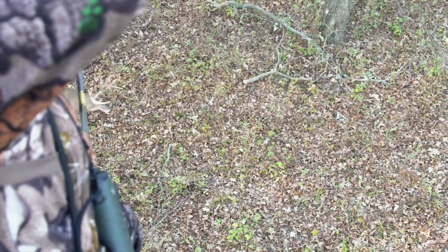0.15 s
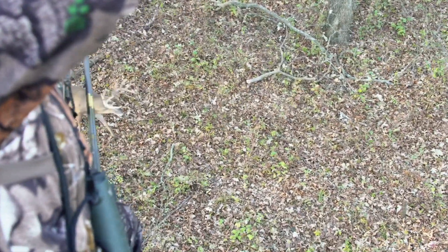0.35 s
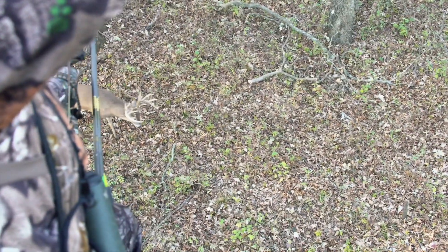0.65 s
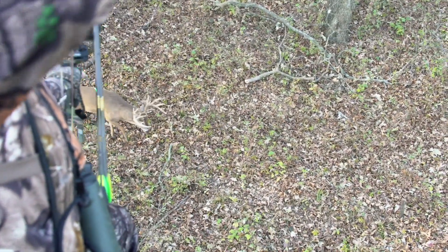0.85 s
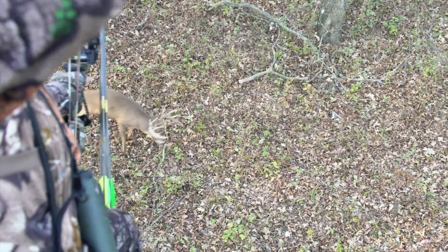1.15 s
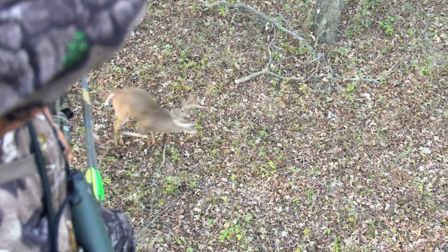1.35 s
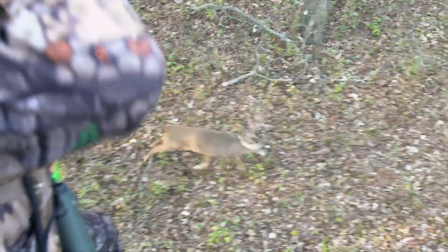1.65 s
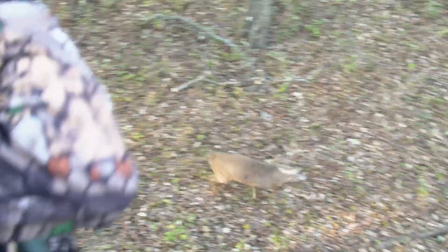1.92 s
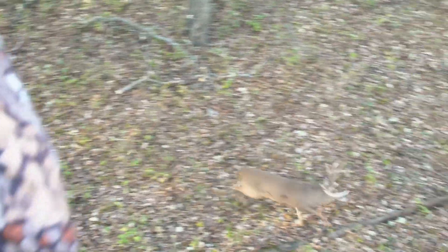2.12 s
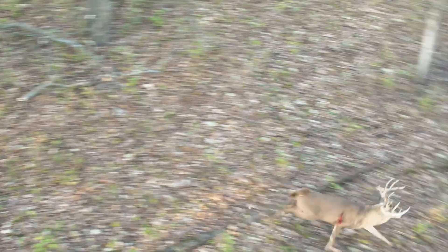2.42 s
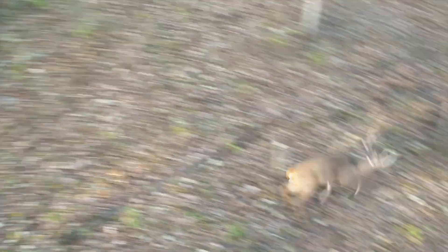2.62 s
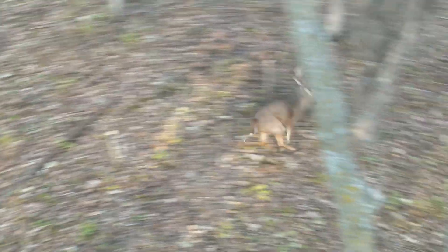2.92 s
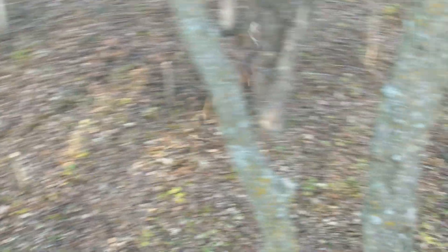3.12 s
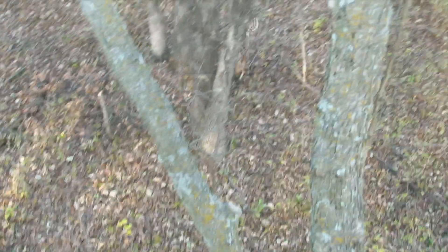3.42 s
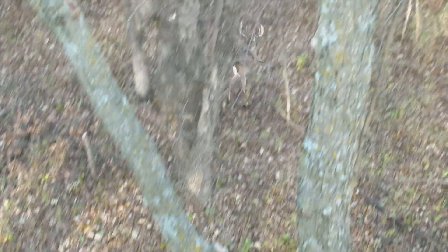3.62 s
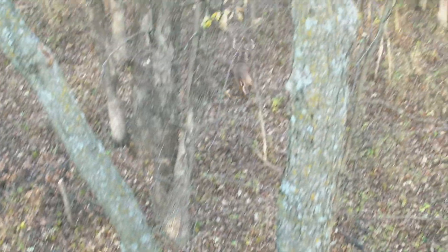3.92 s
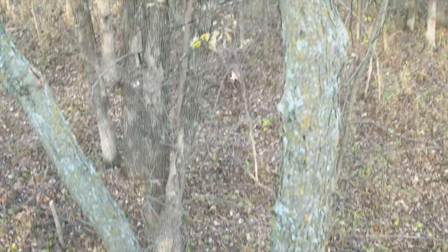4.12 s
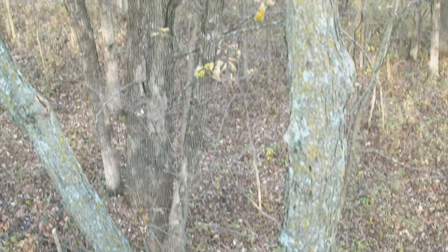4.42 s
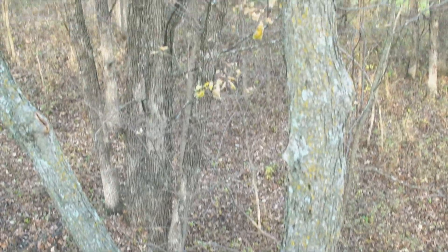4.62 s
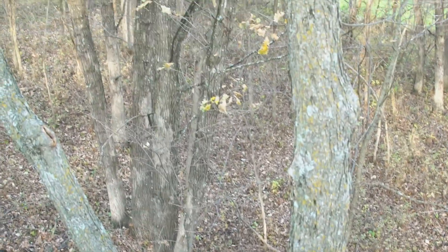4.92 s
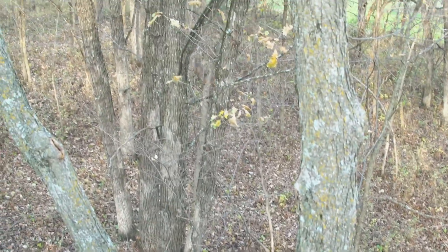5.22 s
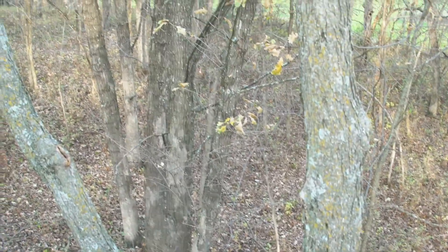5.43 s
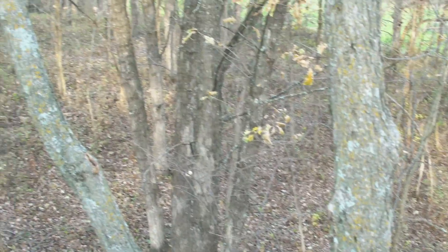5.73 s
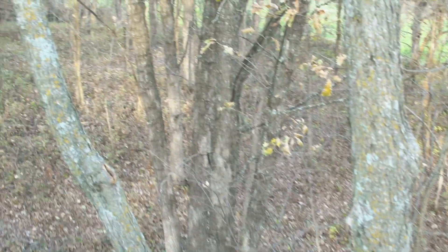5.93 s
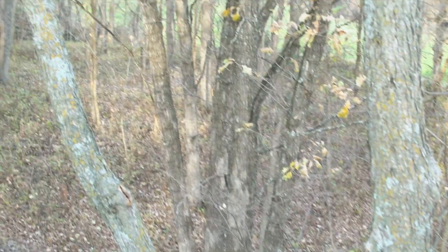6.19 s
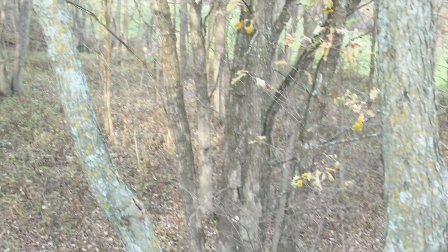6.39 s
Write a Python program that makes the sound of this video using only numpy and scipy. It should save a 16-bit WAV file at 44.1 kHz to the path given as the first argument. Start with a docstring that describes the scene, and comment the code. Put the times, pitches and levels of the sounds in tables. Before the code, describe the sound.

Quiet autumn woodland, heard outdoors through a single microphone: a fine, patchy hiss of dry leaves and a light, low wind rumble. Small soft scuffs come between 0.1 and 0.5 s. At about 0.88 s a bow is loosed with a very sharp, bright slap, a short hard rattle and a brief low limb hum. At 1.0 s the arrow strikes with one compact knock, and leaves burst underfoot. From 1.3 s a deer bounds away in rapid, irregular crunches, brittle and crisp, with twigs snapping, notably at 1.35, 2.5 and 2.9 s. The rush is densest from 2.3 to 3.1 s, with a short scattered echo from trunks. After 3.2 s the steps grow sparser and softer, with a dry snap at 3.9 s and dull, soft thuds beneath. Wind swells around 4.6 s; after 4.8 s only faint rustling and low rumble continue to 6.5 s.

```python
"""A deer bounds off through dry leaves, after a bow is loosed from a tree stand and the arrow strikes.
Each step or scuff crushes a burst of tiny ringing leaf cracks, and now and then a twig snaps.
The bow is a rattle through its modes, a thin slap and a limb hum; the arrow is one knock into modes.
The trunks scatter a short noise echo and soft low thuds ring beneath.
Far leaves rustle as dense cracks, and a light wind rumbles as shaped noise on the single microphone."""
import sys
import numpy as np
from scipy import signal
from scipy.fft import rfft, irfft, next_fast_len
from scipy.io import wavfile

SR = 44100
rng = np.random.default_rng(int(sys.argv[2]) if len(sys.argv) > 2 else 0)


def int16_out(signal):
    """Quantize to a 16-bit WAV file."""
    q = np.round(np.clip(np.atleast_2d(signal).T, -1, 1) * 32767)
    wavfile.write(sys.argv[1], SR, q.astype(np.int16))


N = 289065


def from_db(db):
    """Gain of a level in dB."""
    return 10 ** (np.asarray(db) / 20)


def rms_one(x):
    """Scales x to rms 1."""
    return x / np.sqrt(np.mean(x ** 2) + 1e-20)


def curve(rows):
    """Reads a (time [s], value) table at every sample, with straight lines between its points."""
    return np.interp(np.arange(N) / SR, *np.transpose(rows))


def highpass(x, order, hz):
    """Butterworth high-pass that thins out the bottom of x."""
    return signal.sosfilt(signal.butter(order, hz, "high", fs=SR, output="sos"), x)


def coloured(x, spectrum):
    """Filters x by a (frequency [Hz], gain [dB]) curve and scales it to rms 1."""
    size = next_fast_len(N)
    hz, db = np.transpose(spectrum)
    bin_hz = np.arange(size // 2 + 1) * SR / size
    gain = from_db(np.interp(np.log(bin_hz + 1), np.log(hz), db))
    return rms_one(irfft(rfft(x, size) * gain, size)[:N])


def drift(rate):
    """Slow random wander of rms 1: noise through a double-pole low-pass at rate [Hz]."""
    step = 40   # samples between the points of the wander
    r = np.exp(-2 * np.pi * step * rate / SR)
    noise = rng.standard_normal(N // step + 2002)
    slow = signal.lfilter([1], [1, -2 * r, r * r], noise)[2000:]   # skip the filter's start
    return np.interp(np.arange(N) / step, np.arange(len(slow)), rms_one(slow))


def click(s, db):
    """A single impulse at time s."""
    out = np.zeros(N)
    out[round(s * SR)] = from_db(db)
    return out


def ring(force, hz, t60):
    """Two-pole resonance: a unit click sets off a sine of height 1 that falls 60 dB in t60 [s]."""
    r, w = from_db(-60 / (t60 * SR)), 2 * np.pi * hz / SR
    return signal.lfilter([0, np.sin(w)], [1, -2 * r * np.cos(w), r * r], force + 1e-18)


def body(force, modes):
    """A force rings every mode of a solid body; neighbours swing in opposite senses."""
    out = np.zeros(N)
    for k, (hz, db, t60) in enumerate(modes):
        out += (-1) ** k * from_db(db) * ring(force, hz, t60)
    return out


def crackle(spectrum, per_s, spread_db, cycles, gain_at):
    """Random leaf cracks, each ringing a few cycles at one of many pitches; gain_at(Hz) plays each pitch."""
    pitches = np.geomspace(300, 16000, num=22)
    sizes = from_db(spread_db * np.minimum(rng.exponential(1, N), 4)) * rng.choice([-1, 1], N)
    cracks = sizes * (rng.random(N) < per_s / SR)
    dealt = rng.integers(0, len(pitches), N)   # which pitch each crack rings
    steady, played = np.zeros(N), np.zeros(N)
    for k, hz in enumerate(pitches):
        band = hz * ring(cracks * (dealt == k), hz, cycles / hz)
        steady += band
        played += gain_at(hz) * band
    # colouring resets the level, so the loudness that gain_at gave is put back
    return coloured(played, spectrum) * played.std() / steady.std()


def wind():
    """Wind buffets the microphone: low noise that swells and sinks in lumps."""
    # spectrum of the rumble: (frequency [Hz], gain [dB])
    rumble = [(15, -50), (25, -35), (83, -5), (128, -6), (303, -6), (474, -11), (568, -12.5), (700, -15),
              (910, -37), (1540, -120)]
    # strength of the wind: (time [s], level [dB])
    strength = [(0.0, -46.5), (.31, -63), (.7, -60), (1.0, -48), (1.2, -66), (1.62, -58), (2.1, -65.5),
                (2.95, -64), (3.19, -46.5), (3.42, -44.5), (3.65, -50.5), (4.25, -46), (4.6, -40),
                (4.9, -49), (5.45, -50.5), (5.8, -47), (6.55, -47.5)]
    lumps = from_db(1.9 * drift(19.5))
    return from_db(curve(strength)) * coloured(rng.standard_normal(N) * lumps, rumble)


def far_leaves():
    """Cracks of leaves all around, so dense that they merge into a patchy hiss."""
    # spectrum of the hiss: (frequency [Hz], gain [dB])
    hiss = [(88, -20), (150, -9.5), (382, -3.5), (429, -5), (464, -1.5), (609, -2), (916, 1.5), (1090, 1.5),
            (1550, 4.5), (4980, 3.5), (7950, 4), (15700, -11)]
    # loudness of the rustling: (time [s], level [dB])
    loudness = [(0.0, -35), (.31, -34), (.64, -34.5), (.89, -34.5), (1.09, -28.5), (1.5, -32.5), (2.3, -33),
                (3.19, -31), (3.85, -33.5), (4.1, -31.5), (4.4, -32.5), (4.6, -36.5), (4.91, -33.5),
                (5.4, -35.5), (6.0, -36.5), (6.55, -35)]
    sway = drift(2.24)   # moves all pitches together

    def gain_at(hz):
        """Each pitch adds a faint flicker of its own to the common sway."""
        return from_db(sway + 0.4 * drift(27))
    return from_db(curve(loudness)) * crackle(hiss, 30000, 0.76, 4.44, gain_at)


def thuds():
    """A soft push, smoothed over about a cycle, rings a low pitch."""
    # soft low thuds: (time [s], level of the push before smoothing [dB], pitch [Hz])
    pushes = [(1.003, -33.5, 200), (1.915, -36, 175), (2.159, -37.5, 118), (3.217, -30, 244),
              (3.5, -27, 216), (4.12, -31, 162), (4.561, -31, 114), (5.603, -41, 239), (5.919, -34, 148),
              (6.108, -30.5, 140)]
    out = np.zeros(N)
    for s, db, hz in pushes:
        smooth = signal.butter(2, [hz / 2, hz * 2], "band", fs=SR, output="sos")
        out += ring(signal.sosfilt(smooth, click(s, db)), hz, t60=0.058)
    return out


def trunks(x):
    """Dense scatter from trees and ground: dying noise that begins after a few metres of detour."""
    echo_db, t60, delay, cut_hz = -14.5, .5, .012, 15000   # dB, s, s, Hz
    t = np.arange(SR // 2) / SR
    tail = rng.standard_normal(len(t)) * from_db(-60 * t / t60) * (t > delay)
    tail = signal.sosfilt(signal.butter(1, cut_hz, fs=SR, output="sos"), tail)
    tail /= np.sqrt(np.sum(tail ** 2))
    return from_db(echo_db) * signal.fftconvolve(x, tail)[:N]


def bow():
    """Blows of string and cams rattle the bow's modes and slap thin and broad; the limbs hum on."""
    # blows through the bow: (time [s], rattle into the limbs [dB], bright slap [dB], t60 [s])
    blows = [(0.868, -42.5, -23, 0.092), (0.8774, -42, -4, 0.006), (0.8782, -33, -10.5, 0.034),
             (0.8814, -39, -16, 0.083), (0.898, -39.5, -29, 0.03), (0.913, -62, -32, .5)]
    # resonances of the bow: (frequency [Hz], level [dB], t60 [s])
    bow_modes = [(560, -13, .03), (750, -9, .03), (930, -10, .025), (1254, -6, .06), (1460, 0, .03),
                 (1669, -4, .04), (1820, -3, .03), (1980, -2, .03), (2250, -6, .04), (3600, -5, .005),
                 (12000, -18, .06)]
    # hum of the limbs: (time [s], level [dB], frequency [Hz], t60 [s])
    limb_hums = [(.878, -27, 382, .26)]
    t, rattle, slap = np.arange(N) / SR, np.zeros(N), np.zeros(N)
    for s, rattle_db, slap_db, t60 in blows:
        burst = (t > s) * from_db(-60 * np.abs(t - s) / t60) * rng.standard_normal(N)
        rattle += from_db(rattle_db) * burst
        slap += from_db(slap_db) * burst
    hum = sum(ring(click(s, db), hz, t60) for s, db, hz, t60 in limb_hums)
    return body(rattle, bow_modes) + highpass(slap, 2, 1500) + hum


def strike():
    """The arrow lands with one knock that rings what it hits."""
    # resonances of the struck thing: (frequency [Hz], level [dB], t60 [s])
    struck_modes = [(290, -12, .06), (520, -10, .05), (800, -9, .03), (1200, -3, .022), (1550, -1, .02),
                    (2650, 0, .025), (3240, -3, .02), (6000, -3, .003)]
    return body(click(1.0021, db=-12), struck_modes)


def twigs():
    """A snap rings its pitch and a lower partner for a few cycles over a broad thin tick."""
    # snapping twigs and stalks: (time [s], level [dB], pitch [Hz], cycles rung until 60 dB down [count])
    # few cycles give a dry crack
    snaps = [(0.8374, -19, 8000, 28), (0.9859, -20.5, 2970, 20), (1.1128, -6.5, 7670, 28),
             (1.1437, -8.5, 4310, 28), (1.3445, -5.5, 2110, 28), (1.3449, -14, 920, 36),
             (1.3506, -6, 8230, 28), (1.846, -13, 3500, 20), (1.9366, -10, 7450, 28),
             (1.9817, -9, 9040, 28), (2.1083, -14.5, 3830, 20), (2.1515, -12, 4390, 20),
             (2.2523, -9, 4690, 12), (2.338, -14, 2400, 20), (2.4064, -12.5, 2240, 16),
             (2.4183, -7.5, 3490, 24), (2.4249, -11, 7920, 28), (2.4821, 0, 3700, 16),
             (2.6639, -10, 6850, 28), (2.692, -7, 7920, 28), (2.8089, -9.5, 4570, 28),
             (2.8555, -7, 6930, 28), (2.8842, -1.5, 6000, 12), (3.0546, -8, 9260, 28),
             (3.0691, -10, 9350, 28), (3.3946, -14.5, 1700, 7), (3.5849, -10, 9470, 28),
             (3.586, -13, 3200, 24), (3.9, -5, 4500, 7), (4.045, -20, 2000, 24), (4.4229, -15, 4610, 28)]
    out = np.zeros(N)
    for s, db, hz, cycles in snaps:
        snap, t60 = click(s, db), cycles / hz
        out += from_db(-1.0) * ring(snap, hz, t60)
        out += from_db(-17.5) * ring(snap, 0.705 * hz, t60)
        out += from_db(-4) * np.diff(snap, prepend=0)   # the tick
    return highpass(out, 2, 700)


def steps_and_scuffs():
    """A step bursts up fast, a dragged scuff swells slowly; both die as the crushed leaves settle."""
    # steps and leaf scuffs in the litter: (start [s], level [dB], rise [s], fall [s])
    steps = [(.125, -32, 0.0082, 0.011), (.385, -31, 0.043, .025), (.421, -35, .006, .028),
             (.47, -29, .004, 0.012), (1.001, -16.5, .003, 0.016), (1.018, -21.5, 0.0069, 0.042),
             (1.062, -24, .006, 0.013), (1.11, -18, 0.0039, .007), (1.138, -18, .004, 0.01),
             (1.328, -25, .012, .01), (1.343, -15.5, 0.004, 0.028), (1.434, -27.5, 0.0037, 0.041),
             (1.556, -24, .015, 0.019), (1.575, -21.5, .009, 0.0096), (1.599, -16.5, 0.013, 0.011),
             (1.632, -23, 0.0063, .013), (1.75, -23, 0.097, .034), (1.839, -26, .0045, .038),
             (1.931, -19.5, 0.0079, 0.016), (1.976, -18.5, .003, .025), (2.1, -22, 0.016, 0.028),
             (2.14, -25.5, .01, .015), (2.186, -18, 0.013, 0.0097), (2.313, -19.5, 0.022, 0.011),
             (2.405, -18, 0.012, 0.02), (2.454, -23, .015, .012), (2.481, -21, .003, 0.011),
             (2.563, -18.5, 0.013, 0.022), (2.644, -21, .003, .009), (2.657, -17.5, 0.0087, 0.017),
             (2.677, -12, 0.01, 0.017), (2.798, -18.5, 0.01, 0.026), (2.846, -18, 0.0078, 0.023),
             (2.875, -25, .007, .013), (2.926, -20, .011, 0.012), (2.977, -18, 0.06, 0.052),
             (3.051, -18, .0043, 0.0063), (3.068, -34, .004, 0.0082), (3.204, -30.5, 0.0058, 0.022),
             (3.324, -23.5, 0.032, 0.01), (3.393, -28.5, .0025, 0.0082), (3.454, -19.5, 0.014, 0.018),
             (3.516, -33, .004, 0.0059), (3.54, -20, 0.0092, .021), (3.58, -17, .003, 0.01),
             (3.62, -27, 0.017, 0.023), (3.693, -26, 0.015, 0.038), (3.812, -26.5, .003, 0.027),
             (3.897, -24.5, 0.009, 0.033), (3.999, -27, .006, 0.037), (4.045, -25.5, .012, 0.024),
             (4.19, -27, 0.046, .03), (4.266, -27, .006, 0.022), (4.3, -25, 0.089, .085),
             (4.378, -26.5, 0.0028, 0.019), (4.521, -35, .015, 0.033), (4.706, -30, .029, 0.018),
             (4.769, -33.5, 0.056, .03), (5.298, -38, .012, .073), (5.663, -35, .069, .041),
             (5.836, -36.5, 0.028, .087)]
    # spectrum of crushed leaves: (frequency [Hz], gain [dB])
    crunch = [(150, -51), (250, -24), (660, -19), (1390, -6), (2260, -2), (3080, -3), (3540, 0), (5460, 0),
              (6720, 1), (8710, 6), (10400, -4.5), (12300, -4), (15700, -6.5)]
    # brightness as the deer crosses and leaves: (time [s], tilt [dB per octave])
    brightness = [(.4, -3.5), (1.2, -3.5), (1.6, -1), (2.0, -3), (2.8, -1.5), (3.5, -1), (4.3, -0.9),
                  (4.8, -5), (5.9, -3)]
    step_colour = 1.5   # chance spread of tilt from step to step, dB per octave
    t, power, own = np.arange(N) / SR, np.full(N, 1e-12), np.zeros(N)
    for (s, db, rise, fall), chance in zip(steps, rng.standard_normal(len(steps))):
        rise, fall = max(rise, .002), max(fall, .004)
        span = slice(round(s * SR), round(s * SR) + SR)
        late = t[span] - s
        swell = np.clip(0.057 + 0.52 * late / rise, 0, 1)
        settle = np.exp(-1.2 * (np.maximum(late - rise, 0) / fall) ** 0.95)
        step = from_db(2 * db) * swell * settle   # power, hence twice the dB
        power[span] += step
        own[span] += step * chance
    level = np.sqrt(power)
    tilt = curve(brightness) + step_colour * own / power   # the loudest step sets the colour
    clumps = 1.2 * drift(90)

    def gain_at(hz):
        """Leaves give way in clumps, and each pitch flickers on its own."""
        octaves = np.log2(np.clip(hz, 1300, 11000) / 5000)
        return level * from_db(tilt * octaves + clumps + 2.48 * drift(12.0))
    return crackle(crunch, 21000, 2.2, 14.0, gain_at)


def scene():
    """Everything reaches one microphone, so both channels are alike."""
    near = bow() + strike() + twigs() + steps_and_scuffs()
    near = highpass(near, 3, 210)   # small things radiate little bass
    mono = wind() + far_leaves() + thuds() + trunks(near) + near
    return np.array([mono, mono])


def record(dry):
    """The highest peaks are rounded, then the top is cut steeply."""
    steep = signal.ellip(14, .3, 80, 15780, fs=SR, output="sos")   # ripple and stop-band in dB, cut in Hz
    return signal.sosfilt(steep, np.tanh(dry))


dry = scene()
out = record(dry)
int16_out(out)
```